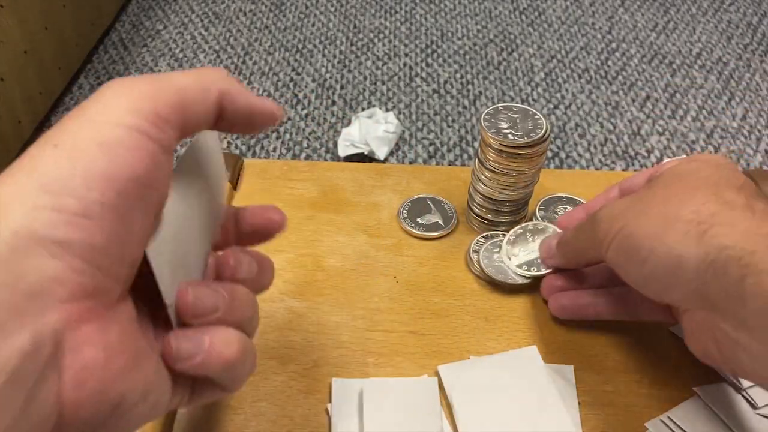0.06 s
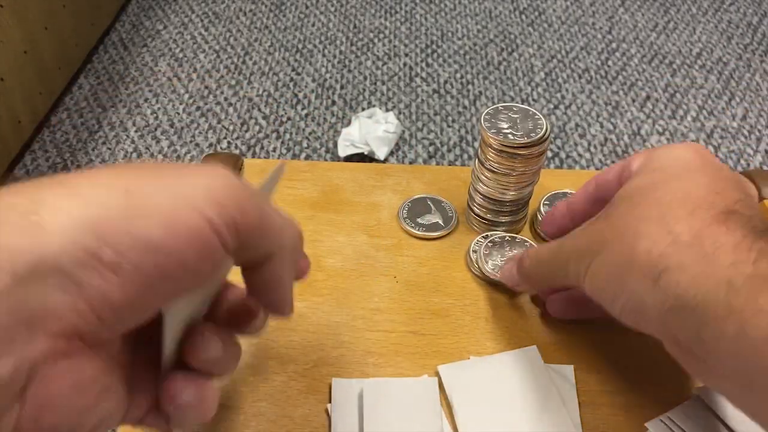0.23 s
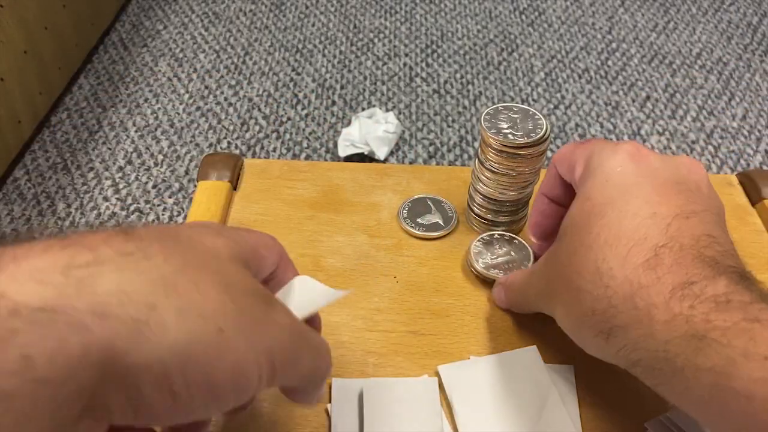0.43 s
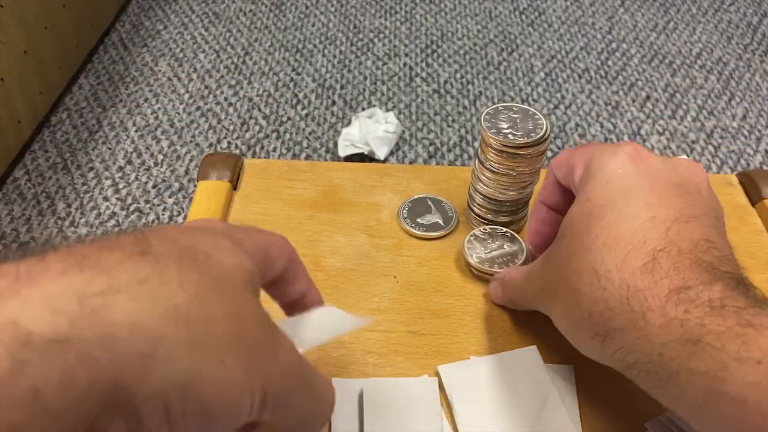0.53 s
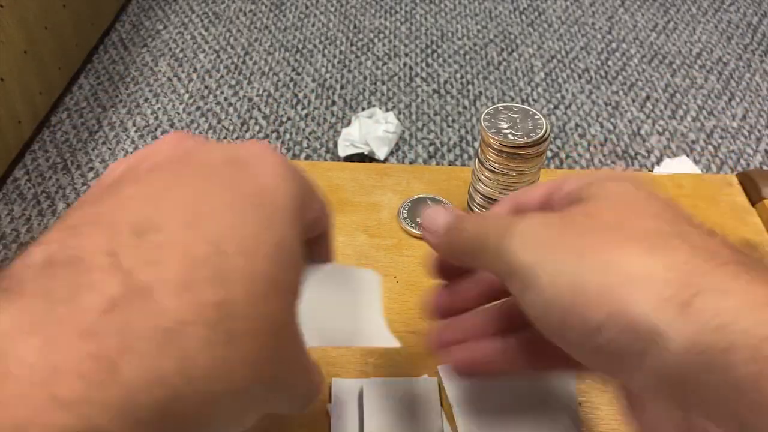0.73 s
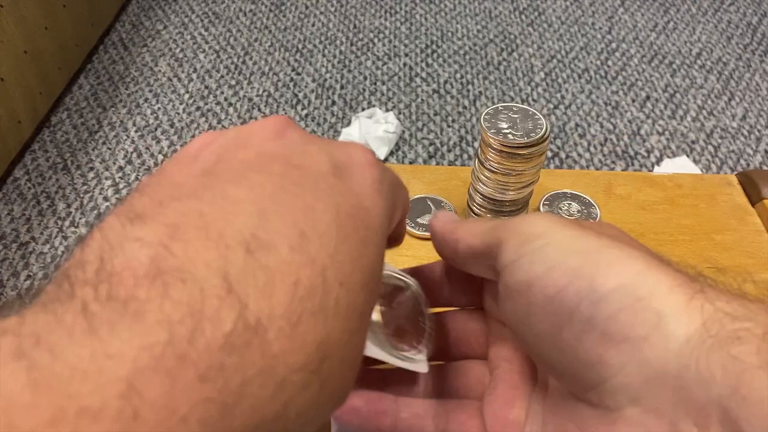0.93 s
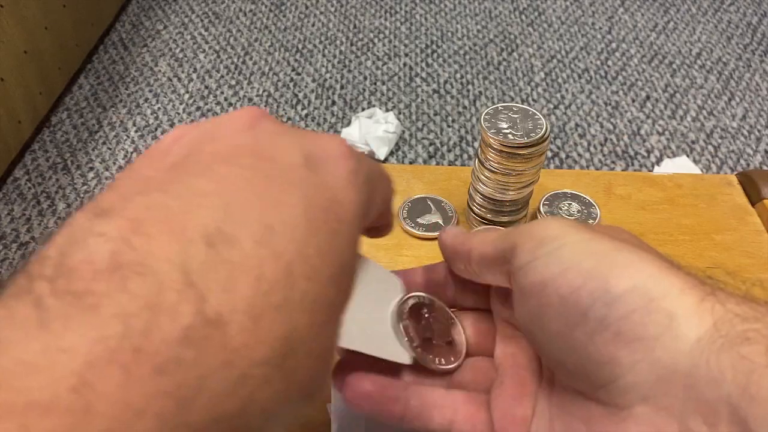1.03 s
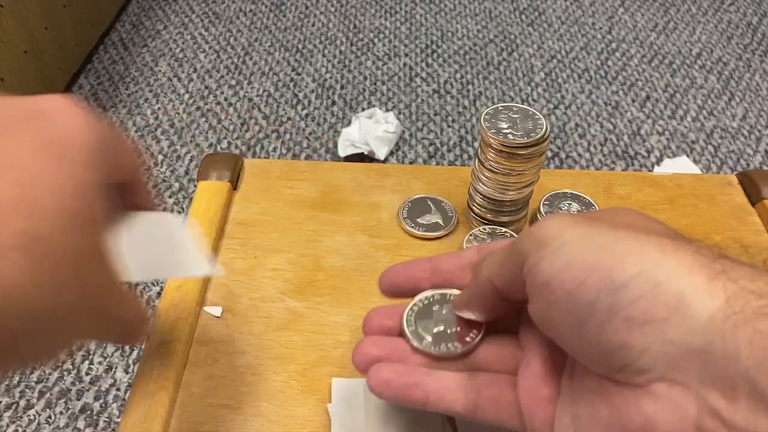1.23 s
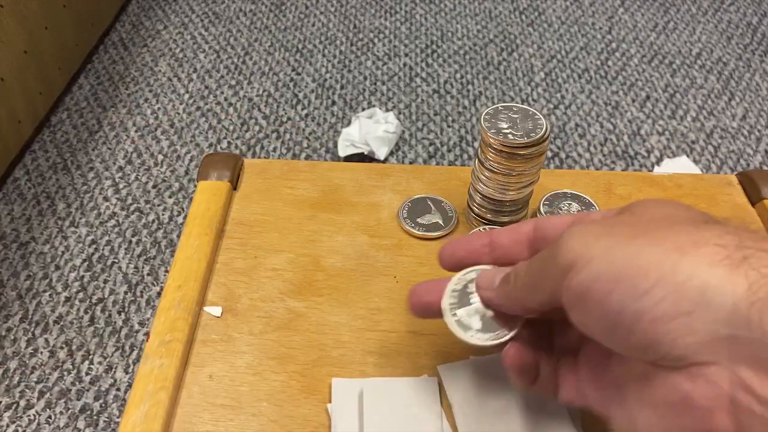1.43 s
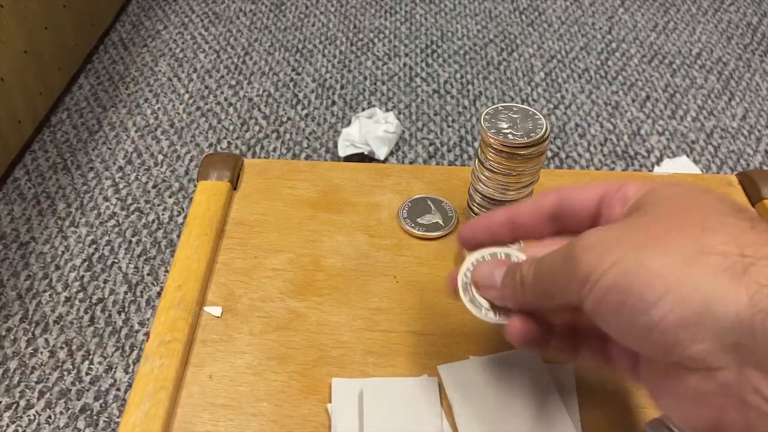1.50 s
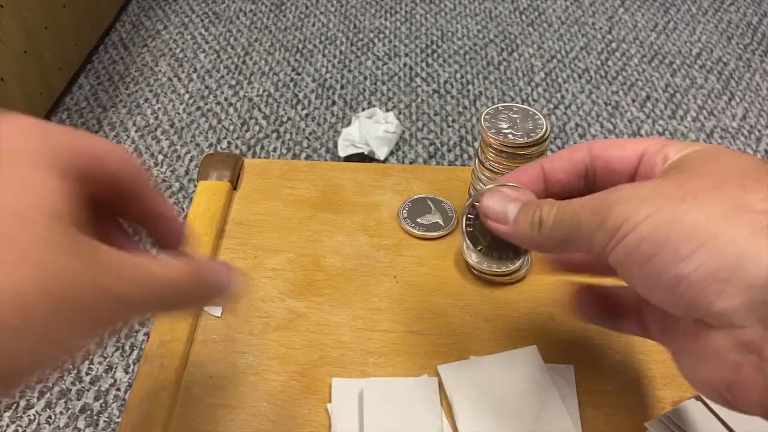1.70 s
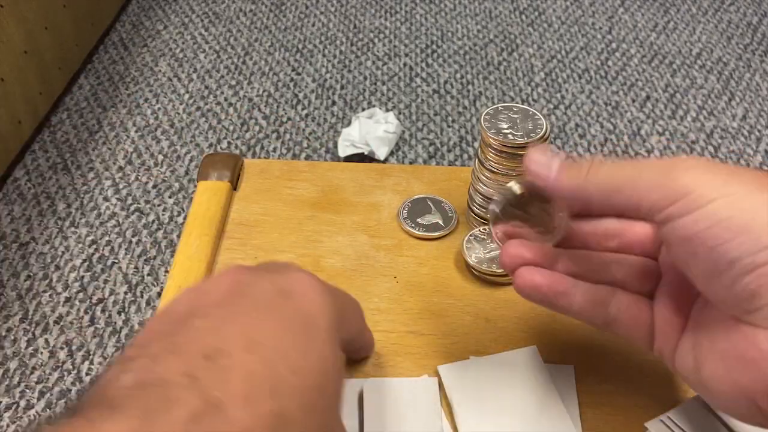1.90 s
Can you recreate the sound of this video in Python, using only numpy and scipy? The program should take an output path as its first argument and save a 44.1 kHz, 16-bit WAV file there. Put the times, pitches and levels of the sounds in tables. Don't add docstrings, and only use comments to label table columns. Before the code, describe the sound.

Coins clack sharply onto one another with a brief ring and rattle, then slide grittily over a hollow wooden table; cloth swishes and paper is tugged away, close to a phone microphone in a quiet ventilated room.

```python
import sys
import numpy as np
from scipy import signal
from scipy.fft import rfft, irfft, next_fast_len
from scipy.io import wavfile
from scipy.ndimage import uniform_filter1d, map_coordinates

SR = 44100
rng = np.random.default_rng(int(sys.argv[2]) if len(sys.argv) > 2 else 0)


def rack_gain(trim_db):
    fader = np.asarray(trim_db, float)
    return 10 ** (fader / 20)


def master(y):
    cut = np.clip(np.atleast_2d(y).T, -1, 1)
    pcm = np.round(cut * 32767)
    wavfile.write(sys.argv[1], SR, pcm.astype(np.int16))


N = 85995


def unit(x):
    return x / np.sqrt(np.mean(x ** 2) + 1e-20)


def along(points, hz):
    f, v = np.transpose(points)
    return np.interp(np.log(hz + 1), np.log(f + 1), v)


def curves(rows):
    s, *columns = np.transpose(rows)
    return [np.interp(np.arange(N) / SR, s, column, -120, -120) for column in columns]


def wobble(rate):
    knots = rng.standard_normal(int(N * rate / SR) + 4)
    return map_coordinates(knots, [np.arange(N) * rate / SR])


def filtered(x, response):
    m = next_fast_len(N + SR // 2)
    return irfft(rfft(x, m) * response(np.fft.rfftfreq(m, 1 / SR)), m)[..., :N]


def coloured(x, spectrum):
    return filtered(x, lambda hz: rack_gain(along(spectrum, hz)))


def body(x, peaks):
    def response(f):
        total = 0
        for k, (centre, width, db) in enumerate(peaks):
            damping = 1j * f * width
            total = total + (-1) ** k * rack_gain(db) * damping / (centre * centre - f * f + damping)
        return total
    return filtered(x, response)


def rub(clump_db, grain_db, patch_db):
    z = signal.stft(rng.standard_normal(N), nperseg=256)[2]
    field = uniform_filter1d(rng.standard_normal(z.shape), size=2, axis=0)
    field = uniform_filter1d(field, size=7, axis=1)
    patchy = signal.istft(z * rack_gain(patch_db * unit(field)), nperseg=256)[1][:N]
    return unit(patchy * rack_gain(clump_db * wobble(90.89) + grain_db * wobble(1200)))


# (frequency [Hz], density [dB per Hz])
AIR_SPECTRUM = [(25, -28.5), (45, -5.5), (270, -7.5), (600, -20.5), (1000, -26), (2000, -29.5), (7000, -48),
                (16000, -71)]
# (frequency [Hz], width [Hz], level [dB])
HUM_LINES = [(66.7, 13, -55), (114.4, 5.8, -55.5), (236.8, 7.6, -63)]


def air():
    air_db = -50.5
    out = rack_gain(air_db + 0.75 * wobble(6.33)) * unit(coloured(rng.standard_normal(N), AIR_SPECTRUM))
    for hz, width, db in HUM_LINES:
        out += rack_gain(db) * unit(body(rng.standard_normal(N), [(hz, width, 0)]))
    return out


# (time [s], level [dB])
NUDGES = [
    (.285, -36),
    (0.388, -32),
    (1.513, -32),
    (1.537, -33),
    (1.576, -29.5),
    (1.615, -33.5),
]


def bumps():
    t = np.arange(N) / SR
    hz, t60_s = 60, 0.088
    out = np.zeros(N)
    for s, db in NUDGES:
        out += rack_gain(db - 60 * abs(t - s) / t60_s) * np.sin(2 * np.pi * hz * (t - s)) * (t > s)
    return out


# (time [s], level [dB])
FINGER_RUB = [(0, -49.5), (.018, -51.5), (.056, -45), (.064, -52), (.12, -52.5), (.17, -49.5), (.21, -50)]
# (frequency [Hz], density [dB per Hz])
SKIN_SPECTRUM = [(300, -40), (600, -11.5), (2000, -1.5), (6500, 2.5), (11000, 0), (16000, -6)]
# (time [s], level [dB])
PALM_RUB = [(1.42, -76), (1.58, -65.5), (1.66, -61.5), (1.75, -63), (1.77, -83.5), (1.81, -78.5),
            (1.84, -62.5), (1.895, -66.5), (1.91, -66.5)]
# (frequency [Hz], density [dB per Hz])
PALM_SPECTRUM = [(3500, -34), (6000, -13), (9000, -4.5), (14000, -7.5), (16000, -5.5)]
# (time [s], level [dB])
CUFF_RUB = [(1.36, -74.5), (1.39, -72), (1.44, -62), (1.47, -73)]
# (frequency [Hz], density [dB per Hz])
CUFF_SPECTRUM = [(400, -34.5), (700, 6.5), (950, -5.5), (1500, -33.5)]
# (time [s], frequency [Hz], level [dB], t60 [s])
THUMB_SINGS = [
    (1.265, 8950, -62, .2),
    (1.652, 8900, -60, .15),
]
# (time [s], slip rate [Hz], level [dB])
PALM_CREAK = [
    (.78, 251, -56),
    (.795, 237, -48.5),
    (.84, 243, -54),
    (.895, 219, -61),
]


def hands():
    t = np.arange(N) / SR
    out = np.zeros(N)
    layers = [(FINGER_RUB, SKIN_SPECTRUM, 2.5), (PALM_RUB, PALM_SPECTRUM, .1), (CUFF_RUB, CUFF_SPECTRUM, .1)]
    for rows, spectrum, gain_db in layers:
        out += rack_gain(curves(rows)[0] + gain_db) * unit(coloured(rub(3.5, 1.0, 0.6), spectrum))
    for s, hz, db, t60 in THUMB_SINGS:
        decay = rack_gain(db - 60 * abs(t - s) / t60) * (t > s)
        out += decay * unit(body(rng.standard_normal(N), [(hz, 150, 0)]))
    rate, db = curves(PALM_CREAK)
    phase = 2 * np.pi * np.cumsum(rate * (1 + 0.027 * wobble(60.4))) / SR
    creak = np.sin(phase) + 0.44 * np.sin(2 * phase) + .1 * np.sin(3 * phase)
    return out + rack_gain(db + 4.3 * wobble(58)) * creak


# (time [s], level [dB])
SLEEVE_SWEEP = [(.7, -53), (.73, -47.5), (.816, -47.5), (.9, -50.5), (.935, -55), (.96, -56.5)]
# (frequency [Hz], density [dB per Hz])
CLOTH_SPECTRUM = [(400, -6.5), (800, -10), (5000, -10.5), (8000, -19.5), (16000, -19.5)]
# (frequency [Hz], width [Hz], level [dB])
WEAVE_BANDS = [(699, 280, 2.5), (2080, 350, 0), (3226, 330, -0.5), (4380, 67, 1.5), (4800, 560, -2),
               (15480, 480, -3)]


def sleeve():
    bands = unit(body(body(rub(0.78, 1.6, 1.0), WEAVE_BANDS), WEAVE_BANDS))
    hiss = unit(coloured(rub(1.3, 1.1, 3.2), CLOTH_SPECTRUM))
    return rack_gain(curves(SLEEVE_SWEEP)[0] + 1.0) * (hiss + rack_gain(1.5) * bands)


# (time [s], frequency [Hz], level [dB])
SLIP_SQUEAK = [
    (1.085, 2550, -56),
    (1.1, 2700, -48),
    (1.125, 3150, -48),
    (1.15, 3500, -66.5),
    (1.165, 3600, -60),
]


def squeak():
    hz, db = curves(SLIP_SQUEAK)
    phase = 2 * np.pi * np.cumsum(hz * (1 + .03 * wobble(300))) / SR
    return rack_gain(db + 5.5 * wobble(400)) * np.sin(phase)


# (time [s], level [dB])
NAIL_FLICKS = [
    (.0865, -26),
    (.1545, -27),
]
# (frequency [Hz], width [Hz], level [dB])
SLIP_MODES = [(900, 150, 2), (2100, 220, -5), (3200, 300, -7), (4250, 300, -9)]
# (time [s], pull [dB], crispness over it [dB])
SLIP_PULLS = [
    [(0.935, -52.5, -19), (0.957, -51, -4), (0.979, -43.5, -10), (0.991, -52.5, -10), (1.027, -45.5, 1.5),
     (1.04, -45, -3)],
    [(1.04, -54, -4), (1.046, -53, 6), (1.056, -40.5, -5.5), (1.094, -39, -10), (1.13, -45.5, 0),
     (1.138, -41.5, 1.5), (1.178, -51.5, -9.5), (1.2, -67, -1.5)],
    [(1.214, -56, -8), (1.222, -51, -9.5), (1.24, -46.5, -3), (1.258, -40, -4.5), (1.27, -46.5, -3.5),
     (1.28, -64, -5)],
]
# (frequency [Hz], width [Hz], level [dB])
TAUT_MODES = [(2093, 170, 2), (5250, 400, -5.5)]
# (frequency [Hz], width [Hz], level [dB])
PAPER_MODES = [(940, 420, -0.5), (1626, 370, 4), (2056, 300, 2.5), (2630, 110, 0.5), (3030, 250, -5),
               (5230, 480, -2.5)]
# (frequency [Hz], density [dB per Hz])
PAPER_SPECTRUM = [(1800, -9.5), (3000, -2), (5400, -2.5), (7500, 0.5), (9500, -4.5), (11800, -7),
                  (16000, -13.5)]


def paper():
    scrape = rub(0.6, 1.575, 2.3)
    rasp = unit(body(body(scrape, PAPER_MODES), PAPER_MODES))
    hiss = unit(coloured(rub(0.9, 1.32, 2.5), PAPER_SPECTRUM))
    touch = rack_gain(curves(FINGER_RUB)[0] - 5.5) * 4.1 * rub(1.53, 1.1, 2.2)
    for s, db in NAIL_FLICKS:
        touch[round(s * SR)] += rack_gain(db + 24)
    taut = unit(body(body(scrape, TAUT_MODES), TAUT_MODES))
    out = body(touch, SLIP_MODES) + squeak() + rack_gain(curves(SLIP_PULLS[0])[0] - 1.5) * taut
    for rows in SLIP_PULLS:
        pull_db, crisp_db = curves(rows)
        out += rack_gain(pull_db + 2.0) * (rasp + rack_gain(np.maximum(crisp_db, -40) + 3.0) * hiss)
    return out


# (frequency [Hz], width [Hz], level [dB])
TABLE_MODES = [(218.2, 33, -12), (312, 26, 2.5), (426.7, 48, 1), (609, 88, -4.5), (741, 66, -6.5),
               (1053, 112, -6.5), (1258, 130, -10), (1885, 100, -14.5), (2540, 130, -28.5),
               (3420, 440, -23.5)]


def table_top(force):
    return body(force, TABLE_MODES)


# (time [s], pressure [dB], grit over it [dB])
RIM_DRAG = [(.225, -35, 1.5), (.25, -38, -13.5), (.262, -47, -4), (.268, -37, 1.5), (.282, -39, -3.5),
            (.305, -38, -4), (.327, -32, -16.5)]
# (frequency [Hz], density [dB per Hz])
DULL_SPECTRUM = [(600, -21), (1300, -2), (2700, 1), (4000, -14), (6500, -12), (16000, -30.5)]
# (time [s], pressure [dB], grit over it [dB])
SLIDE_STROKES = [
    [(.34, -31.5, -2.5), (.352, -23.5, -7.5), (.373, -30.5, -7.5), (.395, -30, -10), (.423, -29, -13),
     (.432, -37, -4), (.455, -40.5, -12), (.49, -55, -3.5), (.555, -55, -0.5)],
    [(.555, -50, -17), (.566, -39.5, -5.5), (.578, -36.5, -14), (.592, -40, -11.5), (.606, -38.5, -11),
     (.614, -34.5, -19.5), (.64, -31, -11.5), (.648, -40.5, -6)],
    [(.648, -37, -3), (.668, -25.5, -12.5), (.678, -36, -5), (.695, -31.5, -10), (.706, -42.5, -14),
     (.716, -39, -15.5), (.73, -37, -15), (.75, -43, -20.5), (.775, -49, -11)],
]
# (frequency [Hz], density [dB per Hz])
GRIT_SPECTRUM = [(800, -28), (1500, -2.5), (2600, 2), (4000, -2), (7500, -4), (12000, -12), (16000, -10.5)]
# (time [s], level [dB])
GRAIN_CATCHES = [(.575, -30), (.611, -27), (.618, -26), (.625, -29), (.636, -26), (.664, -26), (.671, -27),
                 (.684, -29), (.693, -31), (.711, -29)]


def slides():
    judder = unit(table_top(rub(1.8, 1.1, 0.14)))
    catches = np.zeros(N)
    for s, db in GRAIN_CATCHES:
        catches[round(s * SR)] = rack_gain(db + 35)
    out = table_top(catches)
    strokes = [(RIM_DRAG, DULL_SPECTRUM)] + [(rows, GRIT_SPECTRUM) for rows in SLIDE_STROKES]
    for rows, spectrum in strokes:
        pressure_db, grit_db = curves(rows)
        grit = unit(coloured(rub(1.7, 0.99, 3.9), spectrum))
        out += rack_gain(pressure_db - 1.26) * (judder + rack_gain(np.maximum(grit_db, -40) + 1.0) * grit)
    return out


# (time [s], crack [dB], knock in the table [dB], coin ring [dB])
COIN_CONTACTS = [(0.208, -50.5, -52, -65), (0.2153, -16.5, -14.5, -48), (0.2195, -18, -18, -53),
                 (0.265, -48.5, -47, -67), (0.3288, -21, -18, -60), (0.3335, -7.5, -8, -26.5),
                 (0.339, -20, -22, -28), (.3475, -20, -14, -25), (0.359, -19.5, -39, -35),
                 (0.378, -30, -27, -44), (0.394, -28.5, -36, -47), (.4060, -26.5, -20.5, -54),
                 (0.4182, -35.5, -20.5, -51), (.431, -38, -31.5, -60), (0.5487, -53, -60, -78),
                 (0.5642, -61, -35.5, -77), (0.63, -36.5, -58, -67), (0.6174, -45.5, -40, -73),
                 (.6525, -34.5, -31, -64), (0.676, -39, -37, -65), (0.718, -29.5, -34, -47),
                 (1.896, -62.5, -64.5, -90)]
# (frequency [Hz], level [dB], t60 [s])
COIN_MODES = [(2347, -14, .1), (2756, -4, .05), (4936, -9, .18), (6551, -15, .1), (7004, -14, .07),
              (7400, -6, .05), (9075, -10, .06), (9303, -8, .07), (9803, -14, .12), (11060, -13, .07),
              (11670, -7, .13), (11760, -11, .1), (12250, -11, .12)]
# (frequency [Hz], level [dB])
CRACK_SPECTRUM = [(300, -19), (1000, -1), (2300, -1), (4000, -12.5), (7000, 3), (12000, -7.5), (16000, -19)]
# (frequency [Hz], width [Hz], level [dB])
CLACK_MODES = [(1950, 250, 2.5), (2650, 140, 10), (3400, 170, -2), (5450, 83, -13), (7010, 160, -3.5),
               (7780, 360, 8.5), (9720, 590, 2.5), (10380, 450, -1.5), (13240, 380, 1.5),
               (13300, 600, -2.5), (14800, 600, -14)]


def coins():
    t = np.arange(SR // 4) / SR
    rings = np.zeros((len(COIN_MODES), N + SR))
    cracks, blows = np.zeros(N + SR), np.zeros(N)
    hz, mode_db, t60 = np.transpose(COIN_MODES)[..., None]
    crack_decay = rack_gain(-60 * t / .008) + 0.055 * rack_gain(-60 * t / .03)
    for s, crack_db, knock_db, ring_db in COIN_CONTACTS:
        i = round(s * SR)
        level, detune = rng.standard_normal((2, len(COIN_MODES), 1))
        decay = rack_gain(ring_db + mode_db + 2 * level - 60 * t / t60)
        rings[:, i:i + len(t)] += decay * np.sin(2 * np.pi * hz * (1 + .002 * detune) * t)
        cracks[i:i + len(t)] += rack_gain(crack_db) * rng.standard_normal(len(t)) * crack_decay
        blows[i] = rack_gain(knock_db + 34.5)
    rattled = sum(ring[:N] * rack_gain(4.5 * wobble(300)) for ring in rings)
    cracks = cracks[:N]
    clack = rack_gain(3.5) * body(cracks, CLACK_MODES)
    return rattled + coloured(cracks, CRACK_SPECTRUM) + clack + table_top(blows)


def tail(t60):
    t = np.arange(SR // 2) / SR
    burst = rng.standard_normal(len(t)) * rack_gain(-60 * t / t60)
    return burst / np.linalg.norm(burst)


def lag(hz):
    in_phase_hz, turn_hz = 6900, 4350
    turn = 2 * np.pi * np.maximum(hz - in_phase_hz, 0) / turn_hz
    return turn - .38 * np.sin(2 * turn)


# (frequency [Hz], difference [dB])
LEFT_LOUDER = [(100, 2.5), (1000, 1), (5500, 4.5), (6800, 0)]
# (frequency [Hz], lead [radians])
LEFT_LEAD = [(350, -0.13), (800, 0.7), (1400, .6), (2800, 0.31), (4500, 0), (6900, -0.11)]


def ports(x, alike, spread_s):
    other = signal.fftconvolve(x, tail(spread_s))[:N]
    half = np.array([[1], [-1]]) / 2

    def share(hz):
        return np.arccos(np.clip(along(alike, hz), 0, 1)) / 2

    def lean(hz):
        phase = along(LEFT_LEAD, hz) - lag(hz)
        return rack_gain(half * along(LEFT_LOUDER, hz)) * np.exp(1j * half * phase)

    common = filtered(x, lambda hz: lean(hz) * np.cos(share(hz)))
    return common + filtered(other, lambda hz: lean(hz) * np.sin(share(hz)) * 2 * half)


# (frequency [Hz], left-right likeness [0 to 1])
NEAR_LIKENESS = [(60, 0.92), (350, 0.99), (700, .75), (1400, 0.32), (3000, 0.35), (5800, 0.27),
                 (6700, 0.93)]
# (frequency [Hz], left-right likeness [0 to 1])
ROOM_LIKENESS = [(60, 1), (350, 0.59), (700, 0.13), (2000, 0.38), (5800, 0.26), (6700, 1)]


def scene():
    near = [hands(), sleeve(), paper(), slides(), coins()]
    room = rack_gain(-18) * signal.fftconvolve(sum(near), tail(t60=0.37))[:N]
    far = ports(room + bumps() + air(), ROOM_LIKENESS, spread_s=0.26)
    return far + sum(ports(x, NEAR_LIKENESS, spread_s=0.064) for x in near)


def top_cut(x):
    return signal.sosfilt(signal.butter(12, 16830, fs=SR, output="sos"), x)


def record(dry):
    mix = filtered(dry, lambda hz: (hz < 16000) / np.sqrt(1 + (45 / (hz + 1)) ** 8))
    return top_cut(mix)


dry = scene()
out = record(dry)
master(out)
```